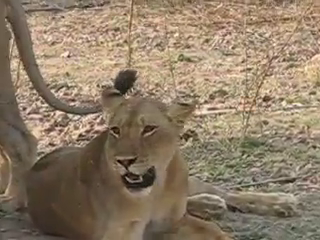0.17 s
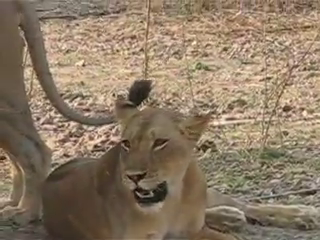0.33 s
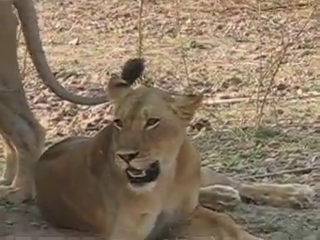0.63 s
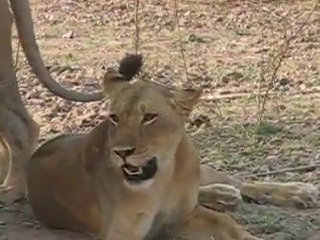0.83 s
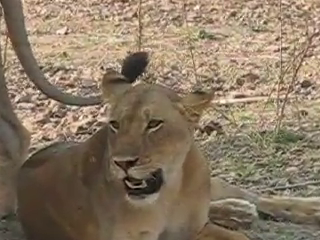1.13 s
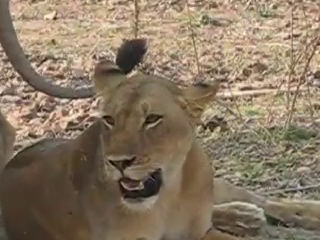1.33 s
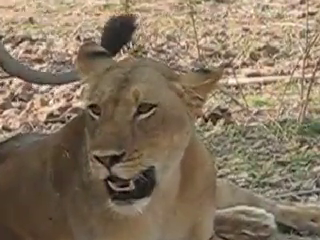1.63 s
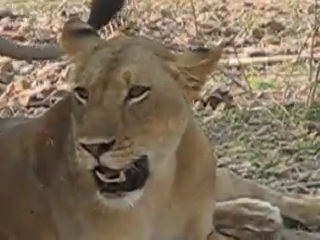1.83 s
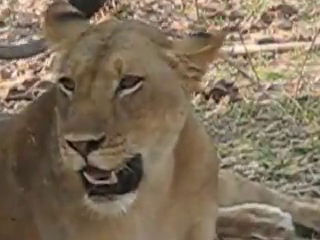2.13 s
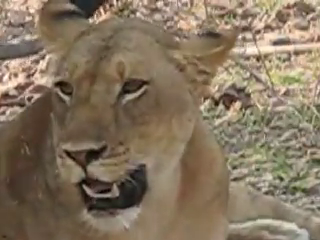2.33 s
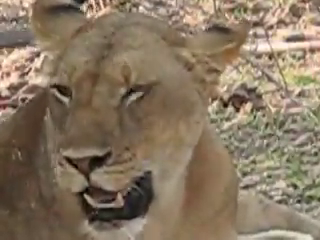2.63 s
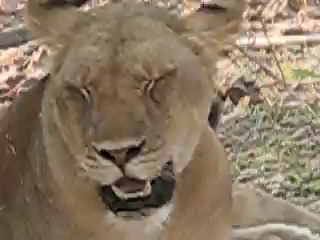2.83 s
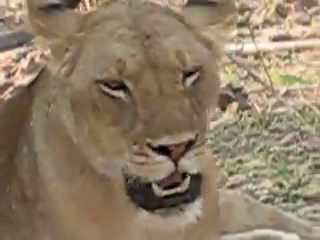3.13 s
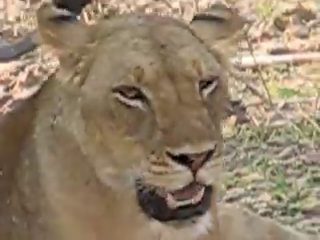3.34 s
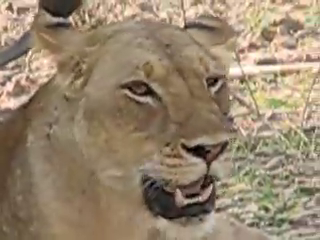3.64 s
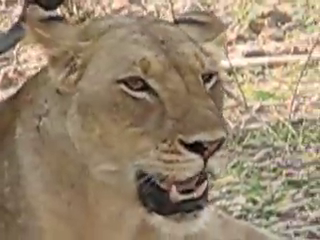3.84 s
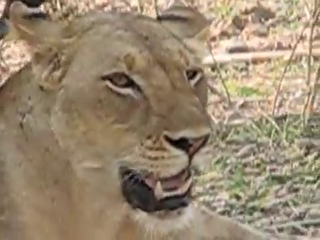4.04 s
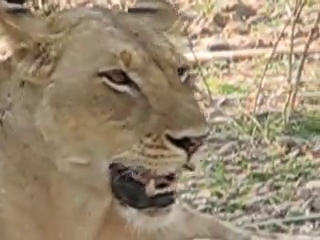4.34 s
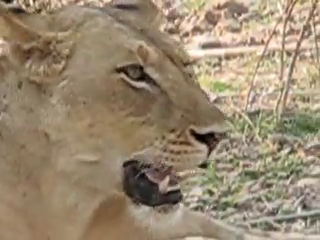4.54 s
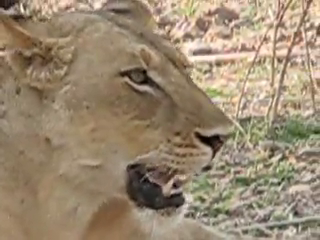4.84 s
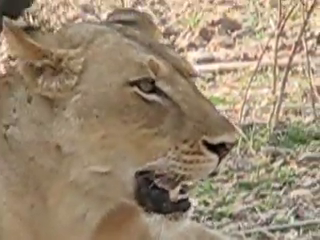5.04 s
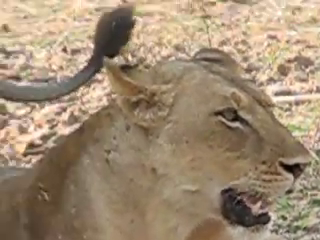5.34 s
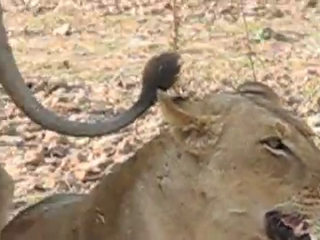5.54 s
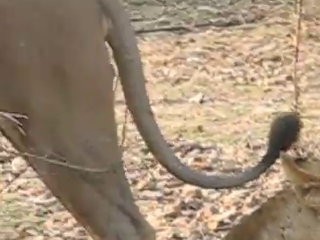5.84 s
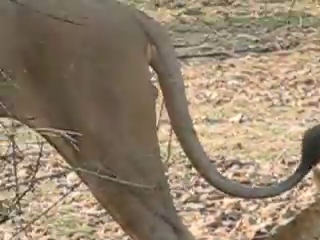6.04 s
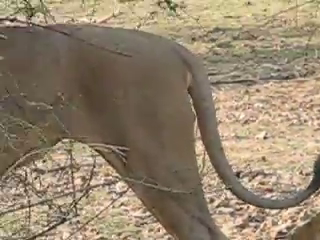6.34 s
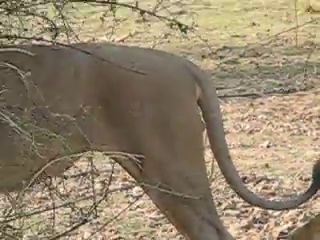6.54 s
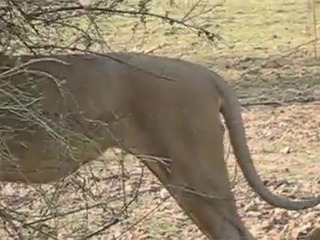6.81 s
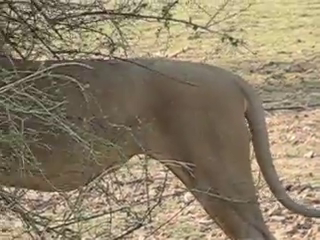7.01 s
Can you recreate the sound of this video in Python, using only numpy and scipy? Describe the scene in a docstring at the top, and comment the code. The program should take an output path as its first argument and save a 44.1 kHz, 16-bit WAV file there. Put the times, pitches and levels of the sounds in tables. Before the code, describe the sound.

Close, deep lion roaring gives way to evenly spaced grunts and snoring in-breaths, over faint insects and a bird in dry bush.

```python
"""A lion's long roar, close by in dry bush, runs out and gives way to shorter grunts, a rasping breath
before each. Heavy vocal folds give a deep tone that breaks into flutter as the push runs out; air
rushes through throat and open mouth, and soft tissue slaps. The bush returns a low echo.
Around the lion: insect trills, a few dry cracks, a faint moan, a whistling bird and a brief rustle,
over a bed of still air, hiss and a thin electronic whine."""
import sys
import numpy as np
from scipy import signal
from scipy.fft import rfft, irfft, next_fast_len
from scipy.io import wavfile
from scipy.ndimage import uniform_filter1d

SR = 44100
rng = np.random.default_rng(int(sys.argv[2]) if len(sys.argv) > 2 else 0)


def generate_wav(sig):
    """Save sig (samples, or channels by samples) to the path in sys.argv[1] as 16-bit PCM at SR."""
    pcm = np.round(np.clip(np.atleast_2d(sig).T, -1, 1) * 32767).astype(np.int16)
    wavfile.write(sys.argv[1], SR, pcm)


N = 316197
T = np.arange(N) / SR

# Rushing air, in the in-breaths and in the background. Each row: frequency in Hz, level in dB.
AIR_SPECTRUM = [(450, 16), (700, 10), (900, 14), (1280, 12), (1800, 3), (2400, 8.5), (3200, 4.5),
                (4500, 2.5), (6000, 4), (8000, -2), (10000, -13), (15000, -44)]


def from_db(db):
    """Decibels as a gain."""
    return 10 ** (np.asarray(db) / 20)


def rms_one(x):
    """The same sound at an overall rms of 1."""
    return x / np.sqrt(np.mean(x ** 2) + 1e-20)


def evened(x, window_s=.04):
    """The same sound held at rms 1 from moment to moment."""
    return x / np.sqrt(np.abs(uniform_filter1d(x ** 2, int(window_s * SR) + 1)) + 1e-9)


def colour(x, points):
    """Filter by a spectrum of (Hz, dB) points; outside them it falls steeply."""
    hz, db = np.transpose(points)
    size = next_fast_len(len(x) + SR // 10)
    f = np.maximum(np.fft.rfftfreq(size, 1 / SR), 1)
    skirts = np.minimum(f / hz[0], 1) ** 2 * np.minimum(hz[-1] / f, 1) ** 2
    gain = from_db(np.interp(np.log(f), np.log(hz), db))
    return irfft(rfft(x, size) * skirts * gain, size)[:len(x)]


def noise(points):
    """Noise at rms 1, coloured by (Hz, dB) points."""
    return rms_one(colour(rng.standard_normal(N), points))


def wide_noise(points):
    """Coloured noise that differs between left and right."""
    return np.array([noise(points), noise(points)])


def wobble(hz):
    """Random motion up to the given rate, spread 1."""
    lowpass = signal.butter(2, hz, fs=SR, output="sos")
    return rms_one(signal.sosfilt(lowpass, rng.standard_normal(N + SR))[SR:])


def curve(calls, column):
    """One column of a run of calls, joined in time; each row begins with its time in seconds."""
    rows = np.vstack(calls)
    return np.interp(T, rows[:, 0], rows[:, column])


def sounding(calls, edge_s=0.01):
    """A gate: 1 during each call, 0 between them."""
    return sum(np.clip(np.minimum(T - rows[0][0], rows[-1][0] - T) / edge_s + 1, 0, 1) for rows in calls)


def bump(t, centre_s, width_s):
    """A smooth hump of height 1."""
    return np.exp(-((t - centre_s) / width_s) ** 2)


def bursts(times, levels_db, decay_s, rise_s):
    """An envelope that rises quickly at each time and dies away."""
    kicks = np.zeros(N)
    kicks[(np.asarray(times) * SR).astype(int)] = from_db(levels_db)
    tails = signal.lfilter([1], [1, -np.exp(-1 / (decay_s * SR))], kicks + 1e-18)
    return uniform_filter1d(tails, int(rise_s * SR) + 1)


def resonate(x, modes):
    """Parallel resonances (Hz, width in Hz, dB), each applied twice so that the valleys stay dark."""
    out = 0
    for hz, width, db in modes:
        r = np.exp(-2 * np.pi * width / SR)
        section = [(1 - r * r) / 2, 0, (r * r - 1) / 2, 1, -2 * r * np.cos(2 * np.pi * hz / SR), r * r]
        out = out + from_db(db) * signal.sosfilt([section, section], x)
    return out


def pulses(cycles):
    """One click for each closing of the vocal folds."""
    return np.diff(np.floor(cycles), prepend=0)


def note(start, length, first_hz, last_hz, db, quaver):
    """A sine that swells and fades while its pitch glides and levels off."""
    out = np.zeros(N)
    on = (T > start) & (T < start + length)
    along = (T[on] - start) / length
    pitch = (first_hz + (last_hz - first_hz) * np.sin(np.pi / 2 * along)) * (1 + quaver[on])
    out[on] = from_db(db) * np.sin(np.pi * along) * np.sin(2 * np.pi * np.cumsum(pitch) / SR)
    return out


def mouth_air(points, spacing_hz=341.5, reflection=0.26):
    """Turbulence bounces between throat and lips; the tube's evenly spaced overtones make it hollow."""
    size = next_fast_len(N)
    f = np.fft.rfftfreq(size, 1 / SR)
    tube = 1 / (1 - reflection * np.exp(-2j * np.pi * f / spacing_hz))
    return rms_one(irfft(rfft(noise(points), size) * tube, size)[:N])


def roars():
    """The long roar and the grunts: heavy folds drive chest and throat, sink in pitch, then flutter."""
    # The long roar's levels. Each row: time in seconds, then chest, throat and rushing air in dB.
    long_levels = [(0, -12, -14.5, -35), (.14, -10, -21, -46.5), (.27, -13.5, -16, -40.5),
                   (0.469, -11, -17, -37.5), (0.559, -9, -28, -43.5), (0.611, -10.5, -19, -37.5),
                   (0.638, -9.5, -31, -46.5), (0.698, -23.5, -32.5, -48.5), (0.809, -44, -63, -74)]
    # Its vocal folds. Each row: time in seconds, pitch in Hz, roughness from 0 to 1.
    long_folds = [(0, 191, 0.34), (0.201, 180, 0.18), (.3, 187, 0.36), (0.362, 160.5, 0.26),
                  (.48, 158, .22), (.54, 141, 0.19), (.61, 138, 0.36), (.67, 112, 0.01), (.7, 64, 0.75),
                  (0.809, 28, 0.8)]
    # The grunts. Each row: start, length, rise and length of the harsh opening in seconds, pitch in Hz,
    # stamina (1 fades evenly, more holds out longer), then base levels of chest, throat and air in dB.
    grunt_rows = [(1.465, .535, 0.02, 0.074, 146, 2.3, -6, -17.5, -35),
                  (2.454, 0.31, 0.0022, 0.07, 143, 1.14, -9.5, -20, -35.5),
                  (3.359, .44, .006, .07, 147, 1.6, -6.5, -18, -34),
                  (4.276, 0.31, 0.0048, .07, 137, 1.304, -8, -19, -35.5),
                  (5.093, .32, 0.003, .07, 146, 1.2, -7, -15.5, -35),
                  (5.889, .31, .003, .075, 143, 1.14, -9, -19, -34),
                  (6.684, 0.35, 0.0024, 0.043, 161, 0.94, -8.5, -18, -32)]
    # Resonances of chest, throat and mouth. Each row: frequency in Hz, width in Hz, gain in dB.
    chest_modes = [(142.2, 26.9, 11.5), (202, 21, -32), (52.2, 7.3, -5)]
    long_throat_modes = [(383.7, 31.2, 4), (605, 55, -7.5), (870, 67, -15), (1056, 72, -14),
                         (1230, 85, -54)]
    grunt_throat_modes = [(239, 59, -6.5), (371, 55.4, 12), (540, 127, -11)]
    grunt_mouth_modes = [(762, 13, -15), (847, 31, -3.5), (1029, 23, -18.5), (1228, 13, -7)]
    # Colours of the chest's rumble and the rushing breath. Each row: frequency in Hz, level in dB.
    rumble_spectrum = [(25, -14), (52, -6.5), (70, -14.5), (100, 1.5), (150, 14), (220, -6), (300, -11.5)]
    long_air_spectrum = [(1200, -28), (1550, -18.5), (1900, -2.5), (2130, 0), (2450, -4.5), (2900, 4.5),
                         (3400, -2.5), (3750, -4), (4550, 0), (5000, 1), (5800, 2), (8000, -8), (9500, -16),
                         (11000, -23.5), (14000, -34)]
    grunt_air_spectrum = [(1300, 8.5), (1550, -9.5), (1850, 3.5), (2150, 1), (2700, 0.5), (3500, -1.5),
                          (4700, -4.5), (5700, 0), (7500, -10), (9000, -15), (11000, -31.5), (14000, -36)]
    mouth_opens_db_per_s = 1.8

    calls, folds = zip((long_levels, long_folds), *(grunt(*row) for row in grunt_rows))
    chest_db, throat_db, air_db = (curve(calls, column) for column in (1, 2, 3))
    pitch = curve(folds, column=1)
    rough = np.clip(curve(folds, column=2), 0, 1)
    grunting = T > long_levels[-1][0] + .1

    jitter = np.exp((.01 + .3 * rough ** 2) * wobble(90))
    cycles = np.cumsum(pitch * jitter) / SR
    swing = np.sin(2 * np.pi * cycles)
    flutter = evened(from_db((2 + 2.5 * rough) * wobble(60)), window_s=.07)
    closings = pulses(cycles) * np.sqrt(SR / pitch) * flutter
    # Air escapes in a puff after every closing; the slacker the folds, the more the puffs stand apart.
    puffs = evened(np.exp((.25 + .4 * rough) * swing) * flutter ** .6, window_s=.06)
    turbulence = puffs * rng.standard_normal(N)

    tone = np.sqrt(2) * swing
    ringing = evened(resonate(closings + .35 * turbulence, chest_modes))
    chest = evened((1 - rough) * tone + rough * ringing + 0.08 * noise(rumble_spectrum))

    rasp = closings + (.4 + .8 * rough) * turbulence
    # The upper resonances grow as the mouth opens wider through the run of grunts.
    opening = from_db(mouth_opens_db_per_s * (T - T.mean()))
    grunted = resonate(rasp, grunt_throat_modes) + opening * resonate(rasp, grunt_mouth_modes)
    roared = resonate(rasp + turbulence / 2, long_throat_modes)
    throat = evened(np.where(grunting, grunted, roared))

    air = np.where(grunting, mouth_air(grunt_air_spectrum), mouth_air(long_air_spectrum)) * puffs
    voice = from_db(chest_db) * chest + from_db(throat_db) * throat + from_db(air_db) * air
    return sounding(calls, edge_s=0.009) * voice


def over_ground(x):
    """The direct sound and its bounce off the ground cancel in narrow bands."""
    # Each row: frequency in Hz, width in Hz, share cancelled.
    notches = [(634, 88, 1), (1860, 190, 0.95)]
    for hz, width_hz, share in notches:
        x = x - share * signal.lfilter(*signal.iirpeak(hz, hz / width_hz, fs=SR), x)
    return x


def stereo_image(x):
    """Direct sound, a touch earlier on the left, plus treble scatter off the ground to widen it."""
    # The lean to one side. Each row: frequency in Hz, left over right in dB.
    balance = [(200, 0.63), (380, -0.2), (1200, 1), (2400, -2.5), (4300, 4.5), (8000, 8.5), (14000, -2.5)]
    # The scatter's colour. Each row: frequency in Hz, scattered against direct sound in dB.
    scatter_spectrum = [(250, -24), (700, -20), (1400, -10), (3000, -6.5), (8000, -1)]
    t = T[:SR // 20]
    scatter = rng.standard_normal(len(t)) * np.exp(-t / 0.011)
    side = colour(signal.fftconvolve(x, scatter / np.linalg.norm(scatter))[:N], scatter_spectrum)
    lean = colour(x, [(10, 0.025)] + [(hz, db / 2) for hz, db in balance]) - x
    left, right = x + lean + side, x - lean - side
    return np.array([left, np.append(0, right[:-1])])


def bush_echo(x, send_db, t60_s=2.2, build_s=0.049):
    """Distant trees send back a long, dull trail."""
    # Each row: frequency in Hz, gain in dB.
    echo_spectrum = [(60, 3), (135, -4.5), (200, -13), (400, -3), (1200, -8.5), (4000, -9.5),
                     (10000, -22.5)]
    t = T[:int(t60_s * SR)]
    trail = rng.standard_normal(len(t)) * from_db(-60 * t / t60_s) * (1 - np.exp(-t / build_s))
    echo = signal.fftconvolve(x, trail / np.linalg.norm(trail))[:N]
    return from_db(send_db) * colour(echo, echo_spectrum)


def still_air():
    """A steady bed of air over the bush, with a low rumble and a high hiss."""
    # Colours of the bush and of the hiss. Each row: frequency in Hz, level in dB.
    bush_spectrum = [(15, -49.5), (25, -25), (93, -13.5), (133, 2.5), (177, -12), (482, -17.5),
                     (612, -18.5), (657, -20.5), (2020, -30), (3030, -52.5), (7500, -55), (9750, -59),
                     (16500, -120)]
    hiss_spectrum = [(6000, -40.5), (7500, 8.5), (9000, 2.5), (10200, -4), (11000, -5), (15500, -6.5)]
    air = from_db(-39.5) * noise(bush_spectrum) + from_db(-45) * wide_noise(AIR_SPECTRUM)
    rumble = from_db(-47) * noise([(15, -5.5), (50, -12), (90, -12)])
    hiss = from_db(-51.5) * wide_noise(hiss_spectrum)
    return air + rumble + hiss


def whine(left_over_right_db=-13.5):
    """Thin, steady electronic tones, off to the right."""
    # Each row: frequency in Hz, level in dB before panning.
    partials = [(7853, -68.5), (7881, -55), (8452, -73), (8511, -50.5)]
    tones = sum(from_db(db) * np.sqrt(2) * np.sin(2 * np.pi * hz * T) for hz, db in partials)
    return tones * from_db(np.array([[1], [-1]]) * left_over_right_db / 2)


def ducking(lion, threshold_db, depth, recovery_db_per_s, lag_s):
    """A gain that sinks under each roar and creeps back up after it."""
    level_db = 10 * np.log10(np.abs(uniform_filter1d(lion ** 2, SR // 20)) + 1e-12)
    cut_db = depth * np.clip(level_db - threshold_db, 0, 14)
    recovery = recovery_db_per_s * T
    held_db = np.maximum.accumulate(cut_db + recovery) - recovery
    pole = np.exp(-1 / (lag_s * SR))
    smooth_db, _ = signal.lfilter([1 - pole], [1, -pole], held_db, zi=[held_db[0]])
    return from_db(-smooth_db)


def flaps():
    """Soft tissue snaps open: a wet slap in the mouth over a thump in the throat."""
    # Each row: start in seconds, slap level in dB, thump level in dB.
    hits = [(0.536, -23.5, -16.5), (0.681, -33, -35), (.736, -36.5, -33.5), (1.125, -55, -35),
            (1.243, -35.5, -25.5), (1.338, -36, -16.5), (1.49, -27.5, -10), (1.752, -25.5, -10),
            (1.843, -26, -11.5), (1.89, -31.5, -25), (1.919, -31.5, -24.5), (2.32, -47.5, -23.5),
            (2.353, -28.5, -28.5), (2.686, -29, -20.5), (3.076, -24.5, -20), (3.228, -29.5, -11.5),
            (3.28, -28.5, -13.5), (3.666, -29, -19.5), (3.728, -28, -29), (4.136, -30.5, -22),
            (4.353, -20, -3.5), (4.445, -25, -12.5), (4.505, -31.5, -33), (5.016, -30.5, -23.5),
            (5.134, -26, -9), (5.368, -36, -44), (5.741, -32, -24), (5.792, -32, -17), (5.97, -24.5, -5.5),
            (6.54, -29, -19.5), (6.617, -23, -15), (6.841, -26, -9.5)]
    # Colours of slap and thump. Each row: frequency in Hz, level in dB.
    slap_spectrum = [(300, -15.5), (700, 7), (1250, 3.5), (1800, -4), (2500, 0), (6000, -15), (9000, -25),
                     (14000, -49)]
    thump_spectrum = [(40, -19), (110, 10), (170, 2), (260, -15.5), (400, 6), (560, -32.5), (900, -39.5)]
    starts, slap_db, thump_db = np.transpose(hits)
    slap = bursts(starts, slap_db, decay_s=0.014, rise_s=0.00048) * mouth_air(slap_spectrum)
    thump = bursts(starts, thump_db, decay_s=0.015, rise_s=0.0046) * evened(noise(thump_spectrum))
    return slap + thump


def insects():
    """Thin, high, scratchy trills that wander a little in pitch."""
    # Each row: start in seconds, length in seconds, pitch in Hz, level in dB.
    trills = [(0.868, 0.15, 8970, -73), (1.199, 0.3, 9906, -70), (2.12, 0.38, 9436, -63),
              (2.855, 0.42, 8980, -59), (3.698, .15, 10170, -61), (3.88, 0.5, 9970, -61),
              (4.671, .2, 9230, -70), (5.148, 0.45, 9432, -65), (6.2, 0.19, 10300, -58)]
    quaver = .007 * wobble(10)
    scratch = wobble(130)
    return scratch * sum(note(start, length, hz, hz, db, quaver) for start, length, hz, db in trills)


def gasp(start, swell_s, length, *crest_db):
    """One in-breath swells to a crest and eases off. Each row: time in seconds, throat and air in dB."""
    swell_db_per_s, ease_db_per_s = (43, 51.5), (78.5, 130)   # throat, air
    t = np.array([0, min(swell_s, length), length])
    before_crest_db = np.outer(np.maximum(swell_s - t, 0), swell_db_per_s)
    after_crest_db = np.outer(np.maximum(t - swell_s, 0), ease_db_per_s)
    return np.column_stack([start + t, crest_db - before_crest_db - after_crest_db])


def gasps():
    """Air drawn in through the open mouth shakes the slack throat like a snore."""
    # Each row: start, swell and length in seconds, then throat and rushing air at the crest in dB.
    in_breaths = [(1.131, 0.24, .305, -26, -34.5), (2.315, .05, 0.1, -24, -35),
                  (3.074, 0.19, .255, -22, -29), (4.134, 0.058, 0.11, -26, -33.5),
                  (4.933, 0.045, 0.1, -25.5, -33.5), (5.748, .055, 0.15, -26, -33.5),
                  (6.49, 0.085, .155, -26.5, -35)]
    # The slack throat's colour. Each row: frequency in Hz, level in dB.
    throat_spectrum = [(30, -18.5), (55, 4), (90, -11), (150, 8.5), (260, -23.5), (400, -7), (520, -29),
                       (700, -43)]
    breaths = [gasp(*row) for row in in_breaths]
    snore = evened(from_db(4 * wobble(45)), window_s=.08)
    throat = from_db(curve(breaths, column=1)) * evened(noise(throat_spectrum)) * snore
    air = from_db(curve(breaths, column=2)) * mouth_air(AIR_SPECTRUM) * snore ** 0.6
    return sounding(breaths) * (throat + air)


def grunt(start, length, rise_s, harsh_s, hz, stamina, *levels_db):
    """One push of air barks, surges, holds, catches and fades: level rows and fold rows for roars()."""
    # Changes of level for chest, throat and rushing air.
    attack_db, bark_db, surge_db = (-19, -5.5, -17.5), (2.5, 4, 1.5), (0.5, 0, 6)
    catch_db, fade_db = (-4, -6, -5.5), (-27.5, -35, -17.5)
    hold_s, settle_s = .085, .03
    t = np.linspace(0, length, 150)
    attack = np.exp(-t / rise_s)
    bark = bump(t, centre_s=rise_s + .012, width_s=0.033)
    surge = bump(t, centre_s=0.077, width_s=0.016)
    catch = bump(t, centre_s=.19, width_s=.035) * (stamina - 1)   # more stamina, a harder catch
    spent = np.clip((t - hold_s) / (length - hold_s), 0, 1) ** stamina
    gestures = np.column_stack([attack, bark, surge, catch, spent])
    db = levels_db + gestures @ [attack_db, bark_db, surge_db, catch_db, fade_db]

    # The folds start harsh, settle into a near sine, sag in pitch and break into slow, uneven flaps.
    stages = [0, .33, .5, 1]   # share of the fade: clean, tired, slack, spent
    stage_hz, stage_rough = [hz, .8 * hz, 63.34, 29.83], [.16, 0.353, .9, 1]
    pitch_dip = .13 * bump(t, harsh_s - settle_s, settle_s / 2) + .08 * catch
    pitch = np.interp(spent, stages, stage_hz) * (1 - pitch_dip)
    harsh = .78 * np.clip((harsh_s - t) / settle_s + .5, 0, 1)
    rough = np.maximum(harsh, np.interp(spent, stages, stage_rough))
    return np.column_stack([start + t, db]), np.column_stack([start + t, pitch, rough])


def cracks():
    """Dry splinterings close by, milliseconds long: a tick over a woody body; hard ones sizzle on top."""
    # Each row: start in seconds, tick level in dB, body against tick in dB, left over right in dB.
    snaps = [(2.52, -18.5, 14, -16), (4.615, -42.5, -20, 12), (7.041, -34.5, 6, 8),
             (7.0593, -28, 0.5, 11.5), (7.125, -36, 8, 11)]
    # Colours of tick, body and sizzle. Each row: frequency in Hz, level in dB.
    tick_spectrum = [(2500, -26), (4500, 7), (7000, -0.5), (10000, -13), (15000, -39)]
    body_spectrum = [(400, -14), (1000, 18.5), (1600, -11), (2300, 7.5), (3500, -7), (5000, -3.5),
                     (8000, -2)]
    sizzle_spectrum = [(5000, -7), (8000, 7), (12000, -5), (14000, -10), (16000, -24)]
    starts, tick_db, body_db, pan_db = np.transpose(snaps)
    bright, woody, sizzle = noise(tick_spectrum), noise(body_spectrum), noise(sizzle_spectrum)
    sides = []
    for side in (1, -1):
        side_db = tick_db + side * pan_db / 2
        tick = np.abs(bursts(starts, side_db, decay_s=0.0019, rise_s=0.0002))
        body = np.abs(bursts(starts, side_db + body_db, decay_s=0.0019, rise_s=0.0002))
        sides.append(tick * bright + body * woody + body ** 1.39 * sizzle)
    return np.array(sides)


def moan():
    """A faint, rising voice from further off, soft and clean with the mouth nearly shut."""
    # Each row: time in seconds, pitch in Hz, level in dB.
    contour = [(2.76, 86, -45), (2.87, 89.1, -44), (2.95, 104.4, -41), (3.0, 132.4, -43),
               (3.04, 141.3, -36.5), (3.08, 143, -41)]
    # The muffled throat. Each row: frequency in Hz, gain in dB.
    throat_spectrum = [(60, 17), (130, -1), (280, 4), (420, 3), (700, -19), (1500, -34)]
    cycles = np.cumsum(curve([contour], column=1)) / SR
    voice = evened(colour(pulses(cycles), throat_spectrum))
    return sounding([contour], edge_s=0.017) * from_db(curve([contour], column=2)) * voice


def bird():
    """Gliding whistles that quaver in pitch and level."""
    # Each row: start and length in seconds, first and last pitch in Hz, level in dB.
    whistles = [(3.782, 0.088, 2830, 2535, -45.5), (4.017, 0.059, 2750, 2586, -48),
                (4.09, .15, 2560, 2268, -39.5), (5.632, 0.098, 2500, 3220, -45),
                (5.846, 0.042, 3229, 2749, -38.5), (6.21, .06, 1880, 2024, -51),
                (6.265, 0.091, 2297, 3255, -49.5)]
    quaver = .016 * wobble(200)
    flicker = from_db(3.7 * wobble(60))
    return flicker * sum(note(*row, quaver) for row in whistles)


def rustle():
    """A high swish that starts at once and dies away."""
    # Each row: frequency in Hz, level in dB.
    swish_spectrum = [(5000, -14), (6500, -4), (8500, 6), (11000, -17), (13500, -8), (16000, -21)]
    swish = bursts(times=[4.835], levels_db=[-31.5], decay_s=0.094, rise_s=0.0094)
    return swish * wide_noise(swish_spectrum)


def scene():
    """The lion in front, small sounds around it; air, whine and echo duck while it roars."""
    lion = over_ground(roars() + gasps() + flaps())
    bed = still_air() + whine() + bush_echo(lion, send_db=-20)
    duck = ducking(lion, threshold_db=-25, depth=0.85, recovery_db_per_s=24, lag_s=0.14)
    return stereo_image(lion) + bed * duck + bird() + insects() + moan() + rustle() + cracks()


def record(dry):
    """The loudest swings overload and flatten; the top is cut."""
    stopband_hz = 16500
    clipped = dry / (1 + dry ** 12) ** (1 / 12)
    return signal.sosfilt(signal.cheby2(12, 60, stopband_hz, fs=SR, output="sos"), clipped)


dry = scene()
out = record(dry)
generate_wav(out)
```